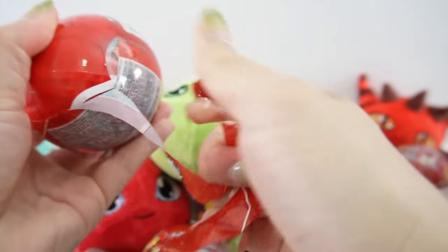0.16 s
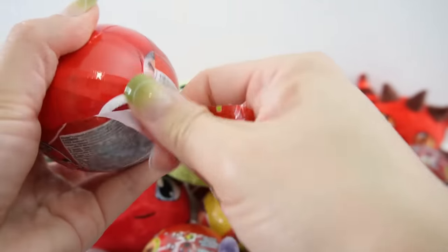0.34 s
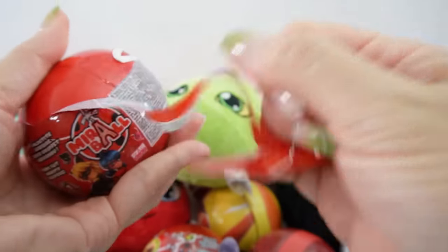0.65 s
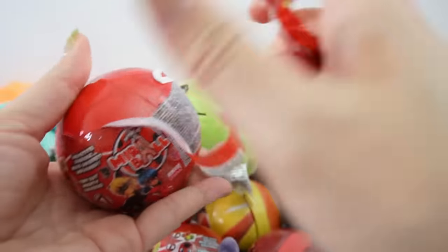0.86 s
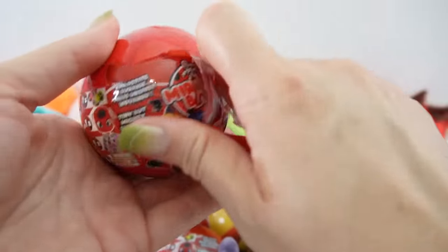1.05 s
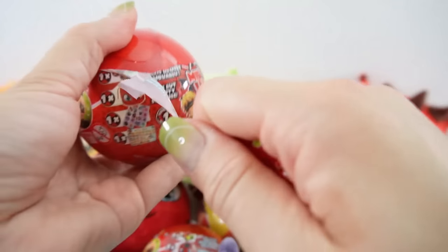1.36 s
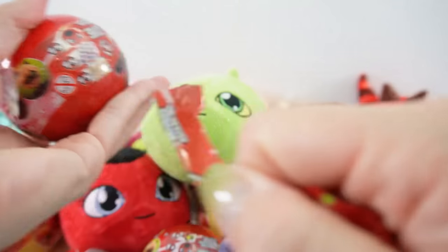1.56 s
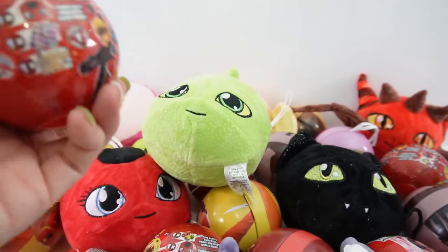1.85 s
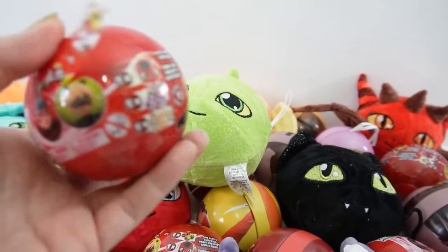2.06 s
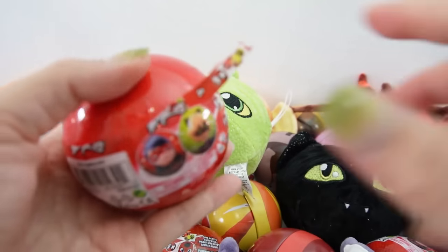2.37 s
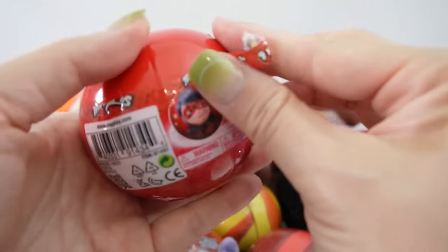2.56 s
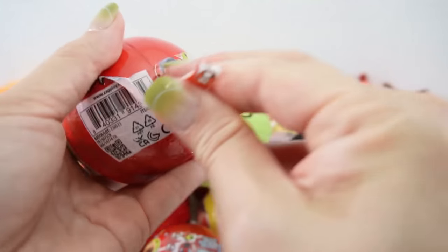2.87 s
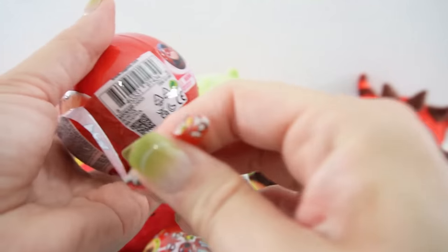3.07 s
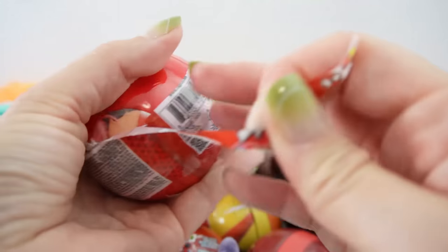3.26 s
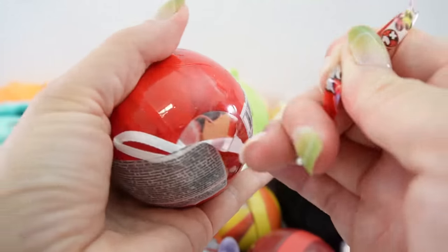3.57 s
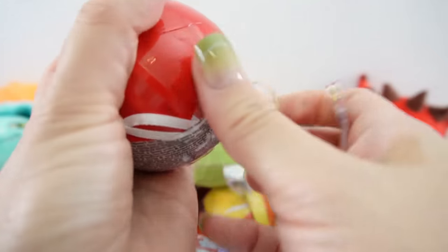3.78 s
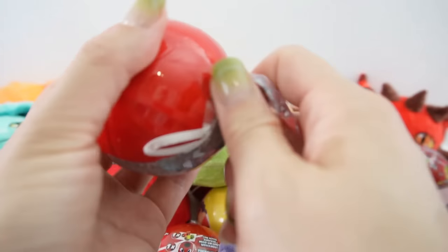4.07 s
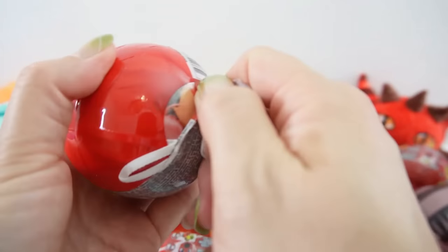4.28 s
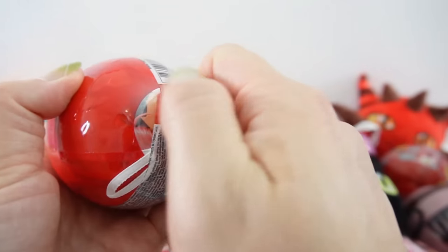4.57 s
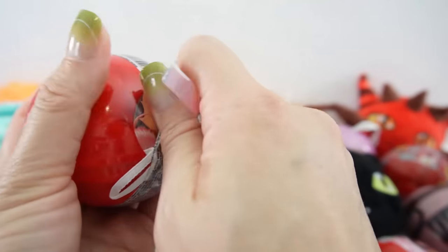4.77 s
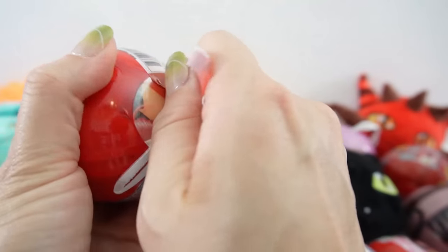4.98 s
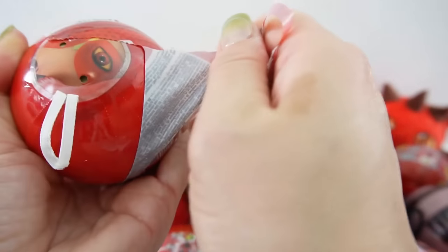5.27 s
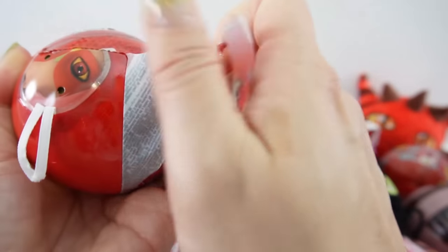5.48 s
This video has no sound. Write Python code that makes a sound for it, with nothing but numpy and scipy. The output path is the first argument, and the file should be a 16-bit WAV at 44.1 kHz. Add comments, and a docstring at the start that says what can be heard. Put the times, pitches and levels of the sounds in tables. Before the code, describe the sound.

Stiff plastic film is pulled off a hollow ball in the hands, very close to a stereo microphone in a small quiet room. Dense sharp snaps and crinkles run for about two seconds, with a short bright rip; then faint sparse ticks and handling, and finally a fresh burst of hard snaps. A faint appliance hum stays underneath.

```python
"""A crinkle of plastic film comes first, over a faint appliance hum; sharp snaps follow at once.
Tight wrap is being peeled and torn off a hollow ball, close by in a small room.
Tiny damped rings make the crinkle and tearing fizz; hard pulls also sound the ball's shell.
Creases snap as short coloured clicks; finger rubs and one bright rip are gliding bands of noise.
The hands scatter the clicks and crinkle, and the room answers with a soft noise tail."""
import sys
import numpy as np
from scipy import signal
from scipy.fft import rfft, irfft, next_fast_len
from scipy.io import wavfile
from scipy.ndimage import uniform_filter1d, minimum_filter1d, map_coordinates

SR = 44100
rng = np.random.default_rng(int(sys.argv[2]) if len(sys.argv) > 2 else 0)


def store_wav(level_fs):
    """Save 16-bit WAV to argv[1]."""
    pcm = np.round(np.clip(np.atleast_2d(level_fs), -1, 1) * 32767)
    wavfile.write(sys.argv[1], SR, pcm.T.astype(np.int16))


N = 248283

# still air of the room: pitch_hz, gain_db
AIR_COLOUR = [(20, -20), (50, -5.5), (90, -4.5), (150, -1), (240, -0.5), (320, -4), (480, -6.5), (590, 1),
              (780, -11), (1500, -10.5), (4000, -16), (9000, -20), (16000, -24)]
# tones of the appliance hum, before wobble and overall trim: pitch_hz, level_db
HUM_TONES = [(118.4, -80), (188.4, -75.5), (248, -81.5), (570.6, -65.5)]
# tugs on the film, before each layer's trim:
# start_s, held_s, crinkle_db, fizz_db (relative to crinkle), shell_db (relative to crinkle)
FILM_TUGS = [(0.0, 0.024, -37, -4.5, -9.5), (0.036, .02, -32, -13, -17), (.06, .14, -28, -5.5, -12.5),
             (.23, 0.056, -31.5, -13, -21), (.34, 0.06, -34.5, -8, -21), (.405, 0.062, -32, -15, -6.5),
             (.47, .025, -32.5, -1, -14), (.57, .05, -33, -3, -19), (.62, 0.12, -28.5, -7, -13),
             (.81, 0.051, -32.5, -8, -13.5), (.94, 0.048, -34.5, -6, -11.5), (1.049, .02, -38.5, 2.5, -5),
             (1.075, 0.067, -32.5, -11, -16), (1.266, 0.026, -24.5, -2.5, -14),
             (1.444, .03, -31.5, -12, -10.5), (1.48, 0.046, -24, -0.5, -21), (1.54, 0.065, -31.5, -8, -22),
             (1.673, 0.044, -30.5, -4.5, -18), (1.78, 0.076, -32.5, -8, -17), (1.91, 0.1, -31, -3.5, -17.5),
             (2.11, 0.065, -42, -6, -11), (2.17, 0.022, -31.5, -8, -14.5), (2.231, 0.11, -40.5, -9, -11.5),
             (2.398, 0.068, -42.5, -9, -11.5), (2.59, 0.094, -55, 0, -12), (2.79, 0.092, -45, -16, -13),
             (2.916, 0.026, -32, -6, -18.5), (2.98, 0.031, -47, -15, -5), (3.213, 0.0087, -42.5, 1, -14),
             (3.34, 0.13, -51.5, -7, -16.5), (3.5, 0.036, -53, 1, -8), (3.63, 0.077, -45, 3.5, -23),
             (3.688, 0.03, -33.5, -2.5, -14.5), (3.74, 0.041, -45.5, -8, -12),
             (4.085, 0.012, -44.5, 0, -25), (4.18, 0.013, -38.5, -3, -18), (4.264, 0.025, -49.5, 13, -14),
             (4.49, .06, -53.5, 9.5, -16), (4.565, 0.056, -47, -10, -15), (4.779, 0.026, -40.5, 1.5, -17),
             (4.99, 0.1, -46.5, 5.5, -26), (5.08, 0.049, -34, -2.5, -36), (5.24, 0.033, -35, -11, -30),
             (5.44, .045, -30.5, -5, -25), (5.492, 0.0068, -25.5, -5, -13.5), (5.615, .015, -37, -11, -14)]
# film merely held, before each layer's trim: crinkle_db, fizz_db, shell_db (one value each)
RESTING_LEVELS = [-62, -66.5, -67.5]
# colour of the film's crinkle: pitch_hz, gain_db
CRINKLE_COLOUR = [(120, -69), (500, -57), (1400, -11), (2000, -0.5), (2500, 2), (3500, 2), (5200, 3.5),
                  (7000, -0.5), (9000, -15), (16000, -24)]
# colour of the tearing fizz: pitch_hz, gain_db
FIZZ_COLOUR = [(100, -78), (3000, -12), (6000, -6.5), (8000, -3.5), (11000, -6), (16000, -12)]
# resonances of the ball in the cupped hand: pitch_hz, width_hz, level_db (relative)
SHELL_MODES = [(384, 480, -6.5), (697, 690, -3), (1047, 200, 1), (1490, 500, -1)]
# how long the room rings: pitch_hz, t60_s (time to fall 60 dB)
ROOM_DECAY = [(300, 0.37), (2000, 0.28), (5500, 0.33), (14000, 0.36)]
# single creases snapping, from loud snaps to faint lone ticks:
# start_s, level_db (over 5 ms, before the parts are summed),
# facet_pitch_hz, treble_crack_db (relative to level), t60_s (time to fall 60 dB)
CREASE_SNAPS = [(.056, -20, 2580, -9, 0.014), (.0601, -14.5, 2600, -7.5, 0.017),
                (.0769, -20, 7000, 4, 0.037), (.129, -15.5, 4040, -20, 0.0088),
                (.1376, -16, 5540, -6, 0.021), (.161, -21, 8500, 1.5, 0.013),
                (.183, -21.5, 2600, -2, 0.012), (.1941, -12, 3500, -9, 0.022),
                (.2349, -14, 5100, -12, .016), (.2564, -14.5, 3300, -20, 0.018),
                (.268, -21.5, 2430, -12, 0.023), (.3039, -17.5, 5160, -2.5, 0.024),
                (.337, -14, 6100, -2.5, 0.0095), (.3468, -14, 5640, -8, 0.0063),
                (.3606, -20, 4400, -18, .011), (.385, -17, 5230, -3.5, .019), (.4051, -20, 2070, -2, 0.032),
                (.4218, -14, 2650, -10, 0.045), (.4584, -14.5, 4500, -10, 0.015),
                (.4849, -16, 2500, -3.5, 0.021), (.4683, -24.5, 5140, 5, 0.0074),
                (.5197, -26, 5200, 1, .013), (.5628, -20, 4830, -9, 0.0084),
                (.5756, -21, 3680, -19, 0.0071), (.5897, -19, 2550, -21, .021),
                (.6142, -13.5, 2500, -16, 0.028), (.6388, -19.5, 8600, 0.5, 0.021),
                (.6534, -16.5, 4930, -13, 0.021), (.671, -12.5, 4630, -19, 0.0081),
                (.7125, -16.5, 2380, -4, 0.022), (.7316, -16, 3120, -6, 0.014),
                (.7849, -15.5, 4670, -11, .015), (.808, -16, 3200, 2.5, 0.018),
                (.817, -15, 4840, -8, 0.025), (.8595, -22, 5200, -17, .015),
                (.8864, -22, 3950, -7.5, 0.067), (.9431, -21.5, 4600, -6.5, 0.045),
                (1.0743, -24.5, 3100, 0, 0.031), (1.098, -21.5, 5500, -0.5, 0.042),
                (1.1068, -19.5, 5360, -9, 0.02), (1.125, -15.5, 4470, -16, 0.032),
                (1.1353, -15, 4940, -9, 0.0024), (1.2402, -26, 3500, -1.5, .041),
                (1.2659, -19.5, 4400, 1, 0.039), (1.3132, -23, 2600, -0.5, 0.03),
                (1.411, -24.5, 2350, -10, .019), (1.442, -18.5, 3100, 2, 0.027),
                (1.505, -14, 2360, -0.5, 0.033), (1.528, -18.5, 6200, -14, .006),
                (1.5325, -13.5, 6800, -13, .011), (1.577, -15, 4400, -21, 0.011),
                (1.5909, -14.5, 4140, -12.5, 0.013), (1.6683, -13, 4100, -13, 0.017),
                (1.7382, -22, 5000, 1.5, 0.0091), (1.8099, -17.5, 5300, -11, 0.019),
                (1.854, -31, 4530, -25, .017), (1.9, -26.5, 4800, -22, 0.017),
                (1.9357, -27, 4300, 0, 0.045), (2.0924, -31.5, 4350, -5.5, 0.032),
                (2.186, -23.5, 7160, -19, 0.034), (2.409, -35, 4100, -12, 0.048),
                (2.449, -38, 4860, -14, .029), (2.5504, -35.5, 3250, -30, 0.018),
                (2.761, -42, 3320, -0.5, 0.054), (2.9162, -21, 3230, -12, 0.014),
                (2.9484, -21.5, 3430, -27, 0.013), (2.9807, -27, 3080, -11, 0.012),
                (3.06, -36, 3770, -14, .013), (3.0973, -29.5, 3450, -9.5, 0.021),
                (3.215, -31.5, 5350, 0, 0.055), (3.3359, -30, 3100, -15, 0.017),
                (3.4205, -34.5, 2590, -6, 0.029), (3.4405, -40, 3930, 3.5, 0.016),
                (3.5145, -31.5, 8050, -2, 0.017), (3.6535, -29.5, 3200, -9, 0.018),
                (3.6911, -22.5, 9100, -5, 0.016), (3.91, -39, 3430, -26, 0.02),
                (4.096, -27.5, 6700, -4, 0.031), (4.163, -30.5, 4850, -14.5, .007),
                (4.1777, -20, 5670, -6, 0.0083), (4.1818, -21.5, 5040, 0, 0.006),
                (4.1922, -26.5, 7900, -9, 0.029), (4.263, -33.5, 8060, 0.5, 0.018),
                (4.3306, -45.5, 6400, 6.5, 0.013), (4.436, -49, 6860, -1, 0.028),
                (4.5482, -33, 4420, -6, 0.041), (4.5633, -24.5, 4500, 6, .022),
                (4.594, -24.5, 4940, -6.5, 0.0072), (4.6244, -29.5, 3900, -4, 0.019),
                (4.8363, -39.5, 2060, -6, 0.016), (4.9866, -19, 8500, -7, 0.013),
                (5.04, -22, 4660, 0.5, 0.016), (5.0615, -18, 5400, -16, 0.0052),
                (5.081, -14, 3100, -10, 0.0083), (5.1853, -19, 6500, -16, 0.013),
                (5.2276, -15, 7140, -27, .021), (5.2519, -18.5, 5400, -5.5, 0.015),
                (5.2927, -25.5, 5250, -11, 0.033), (5.4328, -25, 5300, -19, 0.0074),
                (5.4377, -12, 5250, -9.5, 0.029), (5.4606, -15.5, 5070, -4, 0.024),
                (5.4752, -9, 5340, -6, .016), (5.4919, -10, 6200, -22.5, 0.03),
                (5.6192, -15.5, 8100, -8, 0.015)]
# film flexing around a crease: pitch_hz, gain_db
FLEX_COLOUR = [(100, -84), (500, -54), (1300, -17), (2300, -0.5), (3500, 1.5), (5500, 3.5), (7500, -2),
               (10000, -18), (16000, -23)]
# treble crack of a crease: pitch_hz, gain_db
CRACK_COLOUR = [(100, -81), (2000, -9.5), (6000, -7), (8000, -2), (12000, -7), (16000, -15.5), (19000, -50)]
# a crease's knock on the shell: pitch_hz, gain_db
KNOCK_COLOUR = [(60, -33), (250, -12), (450, -16.5), (750, -7.5), (1150, -4), (1700, -2.5), (3000, -27)]
# fingers sliding on the ball, and one short bright rip of the film (1.472 s), as gliding bands of noise:
# start_s, length_s, from_hz, to_hz, level_db
RUBS_AND_RIP = [(.095, .095, 390, 260, -49), (.395, .07, 1300, 900, -37.5), (.41, .045, 620, 470, -42),
                (1.262, .06, 430, 340, -49), (1.472, .036, 3100, 2600, -28), (2.82, .06, 3400, 2100, -43),
                (2.908, .05, 2600, 3300, -30), (5.078, .07, 2700, 2550, -35),
                (5.232, .085, 1750, 750, -43.5), (5.483, .045, 400, 320, -46)]
# the ball is briefly held off to one side: time_s, left_minus_right_db
BALL_POSITION = [(1.58, 0.1), (1.67, -1.5), (2.1, -3), (2.5, -1.5), (2.9, 0.1)]

GRIP_S, SLACK_DB_PER_S = 0.014, 323  # a tug swells just before its start, then dies as the film slackens
FACET_HZ, SNAP_T60_S = 4600, 0.027  # a typical crease
# knock relative to the crease's level; longer rips and bigger (lower) facets knock harder
KNOCK_DB, KNOCK_DB_PER_DOUBLING = -21.5, 6
TOP_HZ = 16100  # nothing above this is kept


def amp(db):
    """Turn decibels into a gain."""
    return 10 ** (np.asarray(db) / 20)


def unit(x):
    """Scale a sound to an average (rms) level of 1."""
    return x / np.sqrt(np.mean(x ** 2) + 1e-20)


def pulse(x):
    """Scale a short sound to a total energy of 1."""
    return x / (np.linalg.norm(x, axis=-1, keepdims=True) + 1e-12)


def along(points, hz):
    """Read a value between (Hz, value) points, on a log pitch axis."""
    f, v = np.transpose(points)
    return np.interp(np.log(hz + 1), np.log(f), v)


def colour(points):
    """Make a gain function of frequency from (Hz, dB) points."""
    return lambda hz: amp(along(points, hz))


def wobble(rate):
    """Draw a smooth random curve through a given number of random points a second."""
    knots = rng.standard_normal(int(N * rate / SR) + 4)
    return map_coordinates(knots, [np.arange(N) * rate / SR])


def filtered(x, response):
    """Multiply the spectrum of a sound by a response, which may be complex."""
    m = next_fast_len(N + SR // 2)
    spectrum = rfft(x, m) * response(np.fft.rfftfreq(m, 1 / SR))
    return irfft(spectrum, m)[..., :N]


def coloured(x, gain, size=1024):
    """Colour a sound with a minimum-phase filter, which never rings early and so keeps attacks sharp."""
    cepstrum = irfft(np.log(gain(np.fft.rfftfreq(size, 1 / SR)) + 1e-7))
    # folding the cepstrum forward in time gives minimum phase
    cepstrum[1:size // 2] *= 2
    cepstrum[size // 2 + 1:] = 0
    return signal.fftconvolve(x, irfft(np.exp(rfft(cepstrum))))[:len(x)]


def add(track, s, sound):
    """Mix a sound into a track at time s."""
    part = track[..., max(round(s * SR), 0):][..., :sound.shape[-1]]
    part += sound[..., :part.shape[-1]]


def scattered(x, echo_db, t60, width, size=1000):
    """Follow a sound with small after-slips and reflections off ball and hands, different on each side."""
    t = np.arange(size) / SR
    fading = amp(-60 * t / t60) * (t > 1e-4)
    mid, side = pulse(rng.laplace(size=(2, size)) * fading)
    paths = amp(echo_db) * np.array([mid + width * side, mid - width * side])
    paths[:, 0] = 1  # the direct sound
    heard = signal.fftconvolve(x[None], paths, axes=1)
    # the middle of the result keeps the energy of the input
    return heard * np.linalg.norm(x) / (np.linalg.norm(heard.mean(axis=0)) + 1e-12)


def background(air_db=-55.0, hum_db=-1):
    """Room air is coloured noise, wide except in the bass; the appliance hum is a few unsteady tones."""
    width = [(30, -16), (70, -12), (150, -10.0), (600, -4.5), (2000, -5.0), (10000, 0)]  # (Hz, side dB)
    mid, side = filtered(rng.standard_normal((2, N)), colour(AIR_COLOUR))
    side = filtered(side, colour(width))
    air = unit(np.array([mid + side, mid - side]))
    hum = np.zeros(N)
    for hz, db in HUM_TONES:
        level = amp(db + 3.9 * wobble(15))
        turns = np.cumsum(hz + 6 * wobble(25)) / SR
        hum += level * np.sin(2 * np.pi * turns)
    return amp(air_db) * air + amp(hum_db) * np.sqrt(2) * hum


def pull():
    """Each tug grips, holds and slackens, setting the gains of crinkle, fizz and shell over time."""
    t = np.arange(N) / SR
    gains = amp(RESTING_LEVELS)[:, None] * np.ones(N)
    for s, held, db, fizz_db, shell_db in FILM_TUGS:
        grip = np.clip(1 + (t - s) / GRIP_S, 0, 1)
        slack = amp(-SLACK_DB_PER_S * np.clip(t - s - held, 0, 1))
        levels = amp([db, db + fizz_db, db + shell_db])[:, None]
        gains = np.maximum(gains, levels * grip * slack)  # the strongest tug wins
    return gains


def buckles(rate, hz, spread, cycles, size_db, size=160):
    """Many tiny buckles ring and die, very uneven in size, with a steady mean level."""
    count = int(rate * N / SR)
    when, strength, tone = rng.uniform(2e-4, .9998, (count, 3)).T
    pitch = np.clip(hz * (tone / (1 - tone)) ** spread, 200, .4 * SR)
    turns = pitch[:, None] * np.arange(size) / SR
    sizes = amp(-size_db * np.log(strength))[:, None]
    rings = sizes * np.sin(2 * np.pi * turns) * np.exp(-turns / cycles)
    places = (when * N).astype(int)[:, None] + np.arange(size)
    x = np.bincount(places.ravel(), rings.ravel(), N)[:N]
    power = uniform_filter1d(uniform_filter1d(x ** 2, size=900), size=700)
    return x / np.sqrt(np.abs(power) + 1e-6)


def shell_response(f):
    """The ball rings in a few broad resonances, and being small it gives off little bass."""
    modes = 0
    for k, (centre, width, db) in enumerate(SHELL_MODES):
        ring = 1j * f * width / (centre * centre - f * f + 1j * f * width)
        modes = modes + (-1) ** k * amp(db) * ring
    return modes * (1j * f / (1j * f + 250)) ** 2


def peeling(crinkle, fizz, shell, crinkle_db=-1.5, fizz_db=-1, shell_db=-2, count=70):
    """The pulled film crinkles and fizzes, and jerks at the ball as it comes loose."""
    folds = buckles(rate=2000, hz=4000, spread=.3, cycles=1.1, size_db=4.6)
    tears = buckles(rate=3000, hz=9000, spread=.25, cycles=.9, size_db=4.5)
    jerks = buckles(rate=390, hz=1204, spread=0.37, cycles=0.83, size_db=1.5)
    film = amp(crinkle_db) * crinkle * unit(coloured(folds, colour(CRINKLE_COLOUR)))
    film += amp(fizz_db) * fizz * unit(coloured(tears, colour(FIZZ_COLOUR)))
    film += amp(shell_db) * shell * unit(filtered(jerks, shell_response))
    out = np.zeros((2, N))
    # the crinkle's colour changes a little from each short, equal stretch to the next
    for span in np.array_split(np.arange(N), count):
        add(out, span[0] / SR, scattered(film[span], echo_db=-4, t60=.013, width=.65))
    return out


def room(x, side_db=-3, count=16):
    """The room answers with fading noise, a slightly different tail for each equal stretch."""
    out = np.zeros((2, N))
    starts = np.array_split(np.arange(N), count)
    pieces = np.array_split(x.mean(axis=0), count)
    for start, piece in zip(starts, pieces):
        hz, t, z = signal.stft(rng.standard_normal((2, SR // 2)), SR, nperseg=256)
        fading = amp(-60 * t / along(ROOM_DECAY, hz)[:, None])  # each pitch fades at its own pace
        mid, side = pulse(signal.istft(z * fading, SR, nperseg=256)[1])
        tail = np.array([mid + amp(side_db) * side, mid - amp(side_db) * side])
        add(out, start[0] / SR + .003, signal.fftconvolve(piece[None], tail, axes=1))
    return out


def pull_creases(crinkle, over_db=2, spread_db=3, pitch_spread=0.22, crack_db=-6, count=110):
    """More creases flip at random, about as strongly as the film is pulled; rows like CREASE_SNAPS."""
    when = (np.arange(count) + rng.uniform(size=count)) / count
    strength, tone, treble, length = rng.standard_normal((count, 4)).T
    pull_db = 20 * np.log10(crinkle[(when * N).astype(int)])
    level_db = pull_db + over_db + spread_db * strength
    facet_hz = FACET_HZ * np.exp(pitch_spread * tone)
    t60 = SNAP_T60_S * np.exp(0.43 * length)
    return np.transpose([when * N / SR, level_db, facet_hz, crack_db + 5 * treble, t60])


def snaps(creases, facet_db=-2, flex_db=-4.5, crack_db=0.0, facet_width=0.15, size=700):
    """A crease flips: its facet rings a few cycles, film around it flexes and cracks, the shell knocks."""
    out = np.zeros((2, N))
    for s, db, hz, treble_db, t60 in creases:
        facet = lambda f: np.exp(-.5 * (np.log((f + 1) / hz) / facet_width) ** 2)
        doublings = np.log2(t60 / SNAP_T60_S * FACET_HZ / hz)
        parts = [(facet, facet_db),
                 (colour(FLEX_COLOUR), flex_db),
                 (colour(CRACK_COLOUR), treble_db + crack_db),
                 (colour(KNOCK_COLOUR), KNOCK_DB + KNOCK_DB_PER_DOUBLING * doublings)]
        # the parts' energies add up into the colour of one sharp click
        blend = lambda f: np.linalg.norm([amp(level) * pulse(part(f)) for part, level in parts], axis=0)
        strength = np.linalg.norm([amp(level) for _, level in parts])
        click = strength * pulse(coloured(signal.unit_impulse(size), blend))
        slips_db = 14 * np.log10(t60 / .011)  # a long snap is a little rip, mostly after-slips
        snap = scattered(click, echo_db=slips_db, t60=t60, width=.5)
        add(out, s, amp(db) * np.sqrt(.005 * SR) * snap)
    return out


def rubs_and_rip(rise=0.55):
    """Uneven friction of fingers, and one short bright rip, are bands of noise that glide in pitch."""
    out = np.zeros(N)
    unevenness = amp(4.5 * wobble(260))
    for s, length, from_hz, to_hz, db in RUBS_AND_RIP:
        u = np.linspace(0, 1, int(length * SR))
        turns = np.cumsum(from_hz * (to_hz / from_hz) ** u) / SR
        # two slower random curves turn a gliding tone into a band of noise
        a, b = [map_coordinates(rng.standard_normal(256), [turns * .45], mode="wrap") for _ in range(2)]
        band = a * np.sin(2 * np.pi * turns) + b * np.cos(2 * np.pi * turns)
        swell = np.sin(np.pi * u ** rise)
        add(out, s, amp(db) * unit(band * unevenness[int(s * SR):][:len(u)] * swell))
    return out


def placed(x, widening=0.22):
    """Two close microphone ports differ mostly in the treble, more so when the ball is off their axis."""
    # (Hz, side dB), before the widening
    width = [(300, -10), (1100, -13.5), (2800, -8), (5600, -4), (10000, .5), (14000, 4.5)]
    pan_db = np.interp(np.arange(N) / SR, *np.transpose(BALL_POSITION))
    mid = (x[0] + x[1]) / 2
    side = filtered((x[0] - x[1]) / 2, colour(width)) * (1 + widening * np.abs(pan_db))
    return np.array([mid + side, mid - side]) * amp([pan_db / 2, -pan_db / 2])


def scene(room_db=-9):
    """Mix the wrapper close by, its echo and the quiet room."""
    crinkle, fizz, shell = pull()
    wrapper = peeling(crinkle, fizz, shell)
    wrapper = wrapper + snaps(pull_creases(crinkle)) + snaps(CREASE_SNAPS) + rubs_and_rip()
    return placed(wrapper + amp(room_db) * room(wrapper)) + background()


def record(dry):
    """A fast limiter holds the peaks at full scale, then everything above the band limit is removed."""
    needed = 1 / np.maximum(np.abs(dry).max(axis=0), 1)
    held = dry * uniform_filter1d(minimum_filter1d(needed, size=61), size=61)
    return filtered(held, lambda hz: hz < TOP_HZ)


dry = scene()
out = record(dry)
store_wav(out)
```